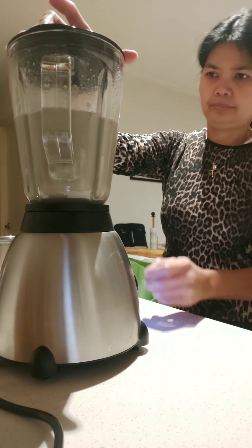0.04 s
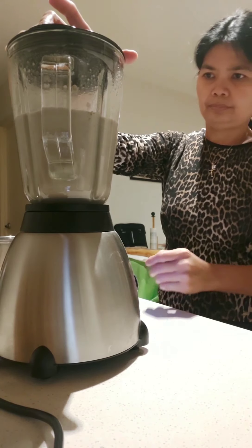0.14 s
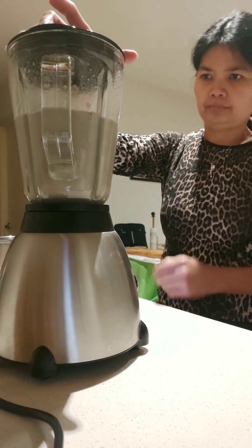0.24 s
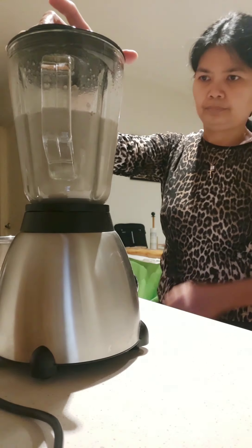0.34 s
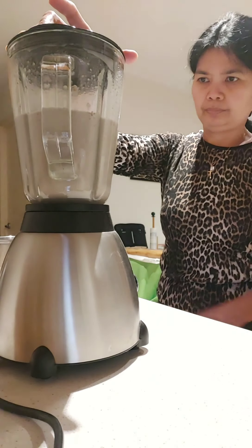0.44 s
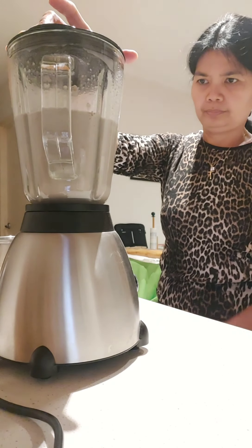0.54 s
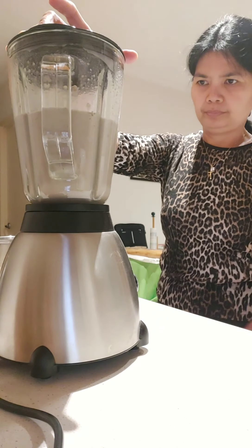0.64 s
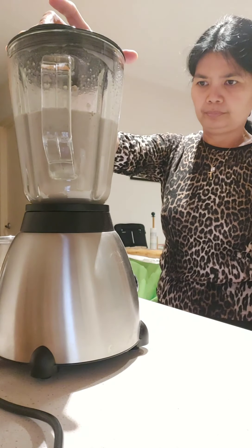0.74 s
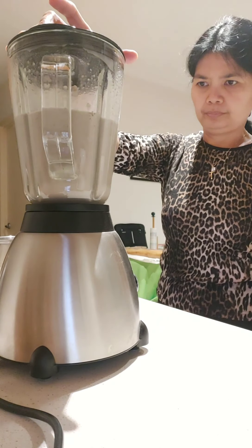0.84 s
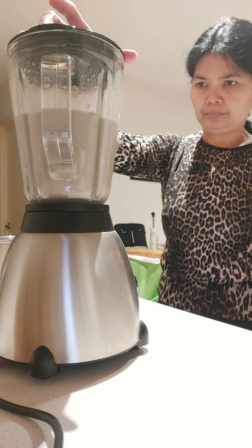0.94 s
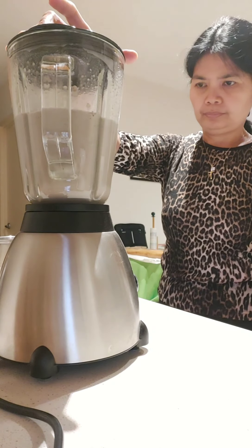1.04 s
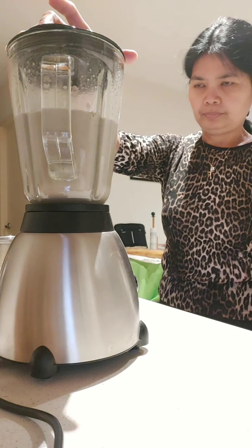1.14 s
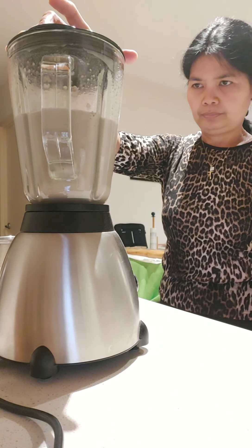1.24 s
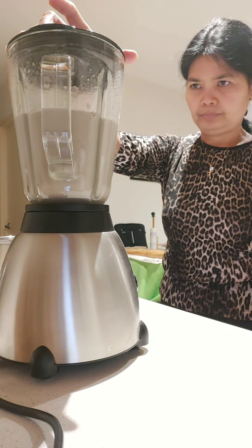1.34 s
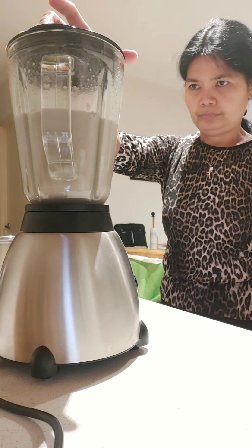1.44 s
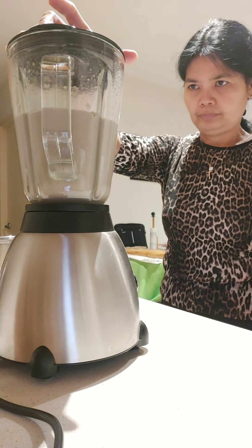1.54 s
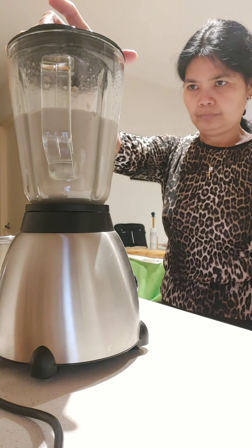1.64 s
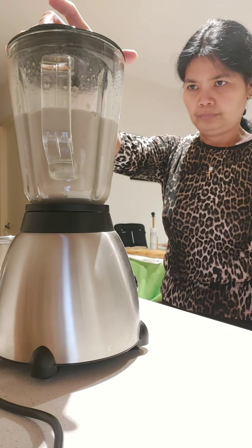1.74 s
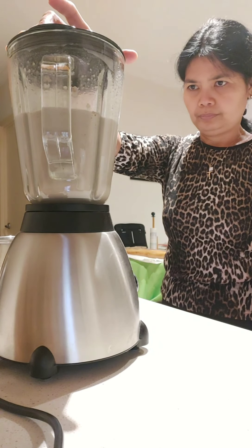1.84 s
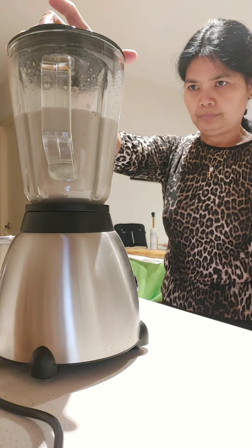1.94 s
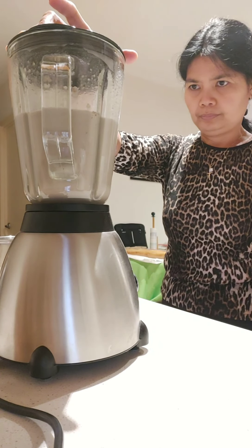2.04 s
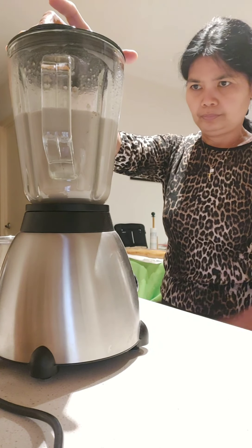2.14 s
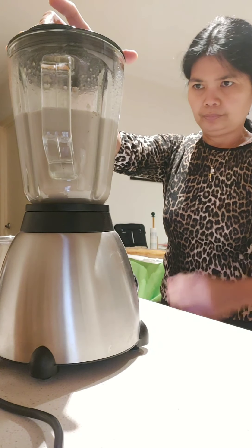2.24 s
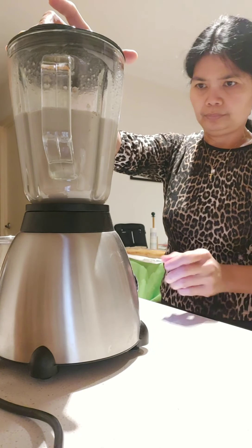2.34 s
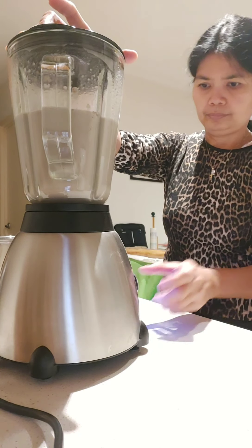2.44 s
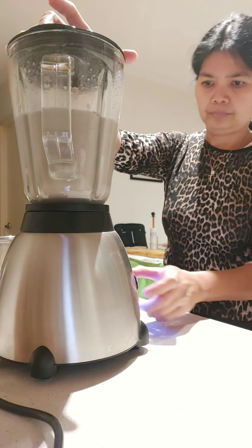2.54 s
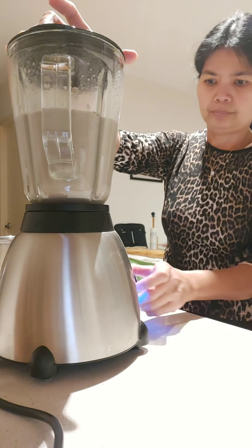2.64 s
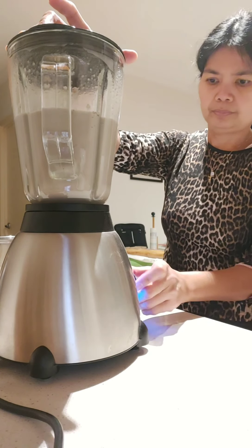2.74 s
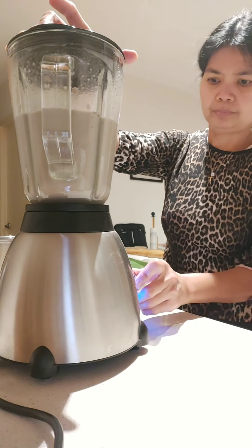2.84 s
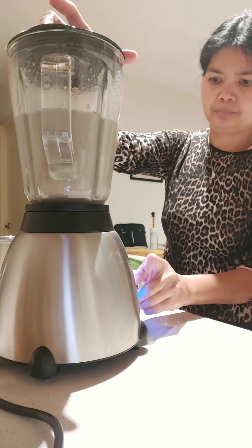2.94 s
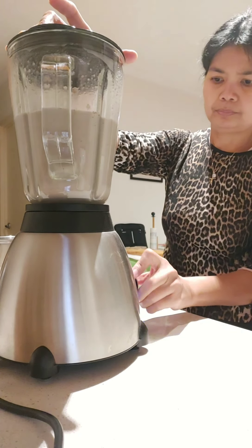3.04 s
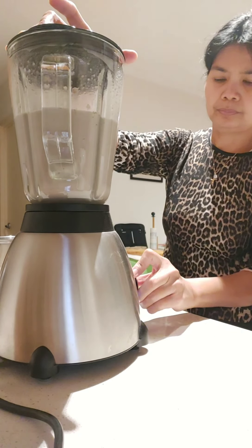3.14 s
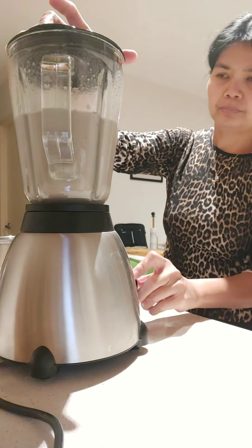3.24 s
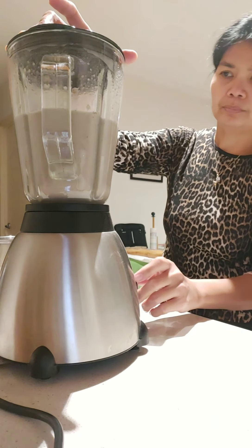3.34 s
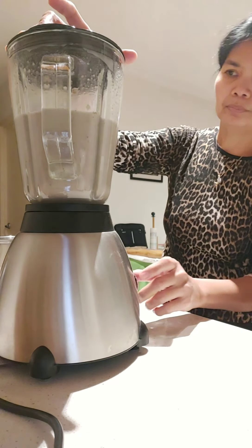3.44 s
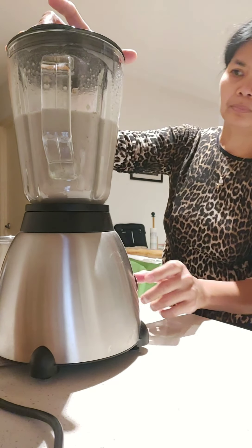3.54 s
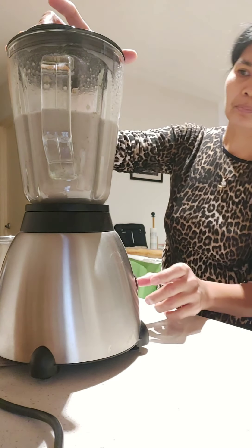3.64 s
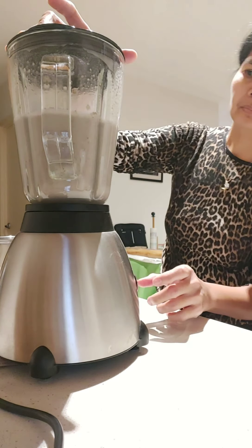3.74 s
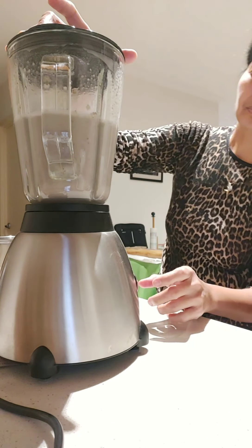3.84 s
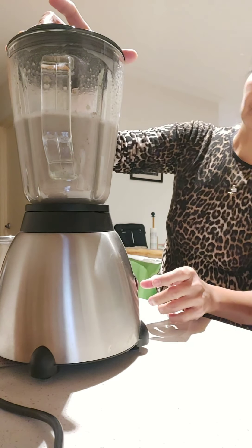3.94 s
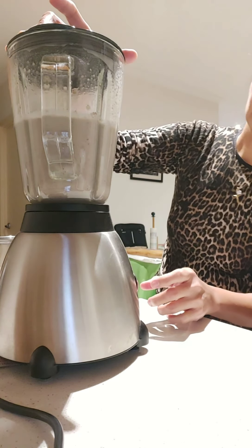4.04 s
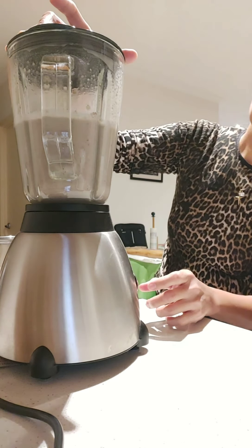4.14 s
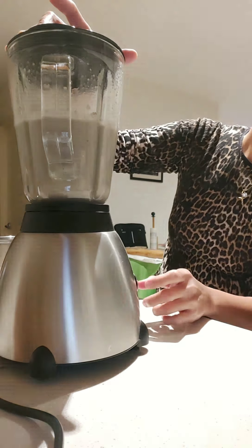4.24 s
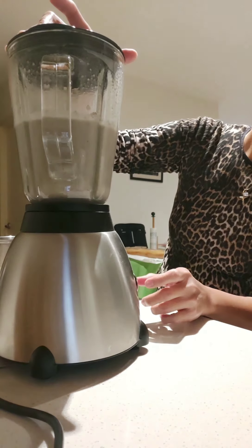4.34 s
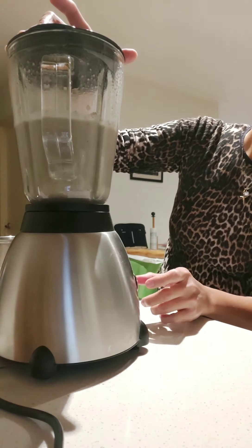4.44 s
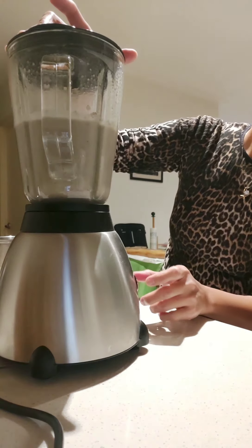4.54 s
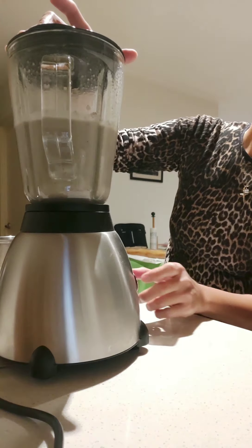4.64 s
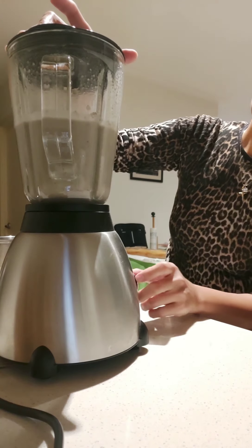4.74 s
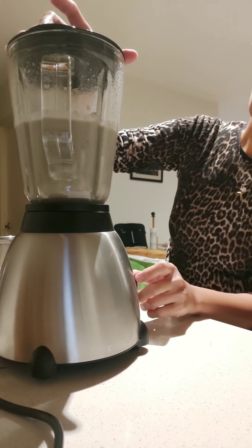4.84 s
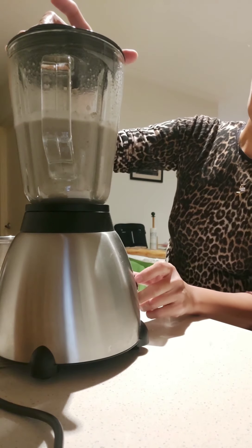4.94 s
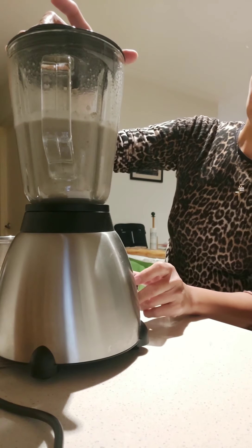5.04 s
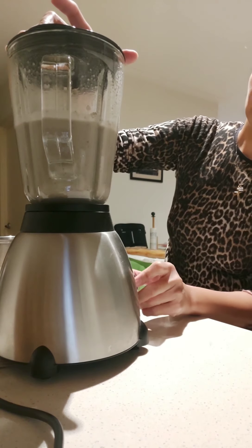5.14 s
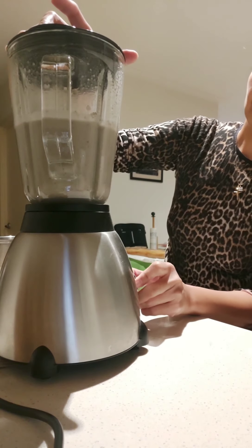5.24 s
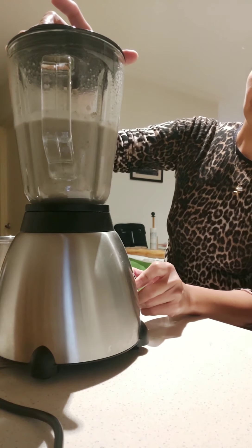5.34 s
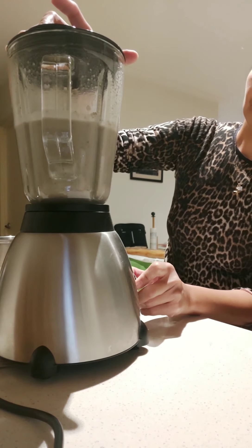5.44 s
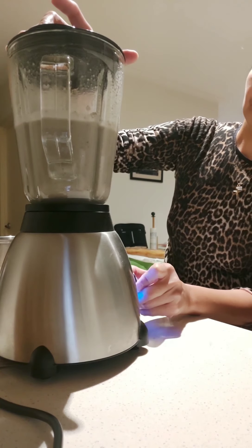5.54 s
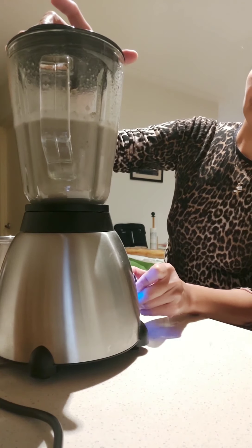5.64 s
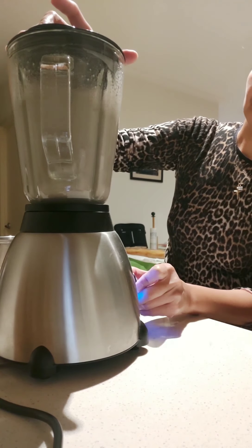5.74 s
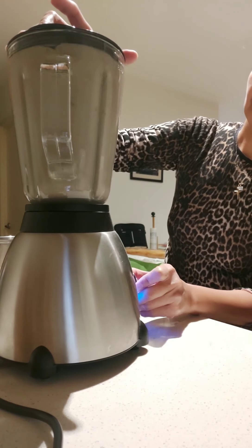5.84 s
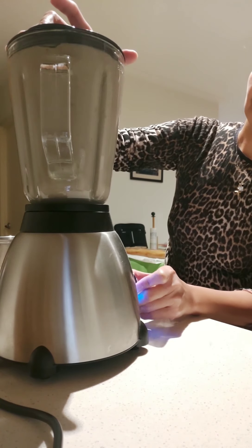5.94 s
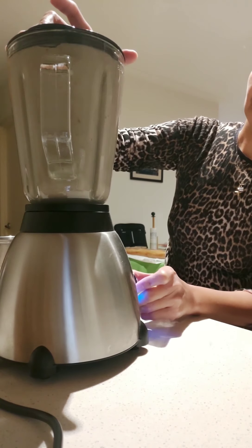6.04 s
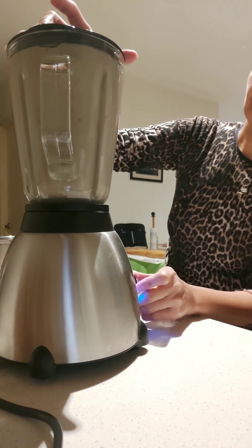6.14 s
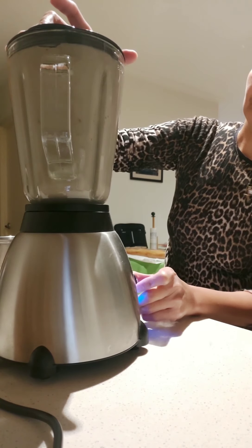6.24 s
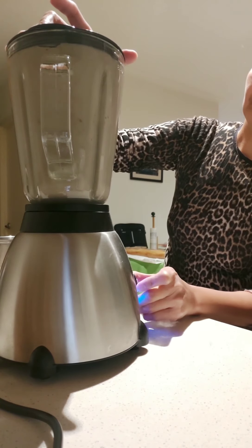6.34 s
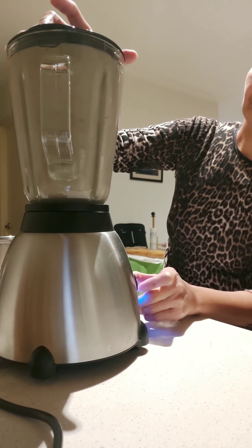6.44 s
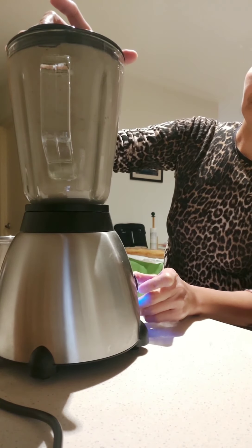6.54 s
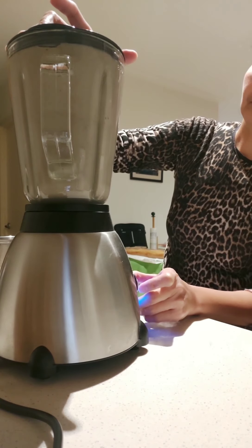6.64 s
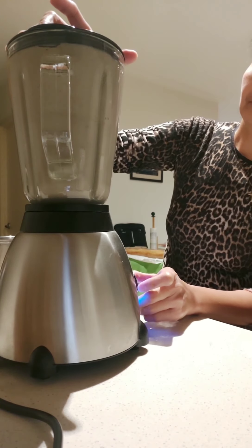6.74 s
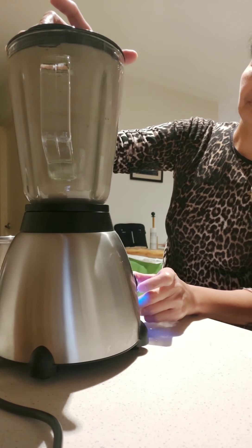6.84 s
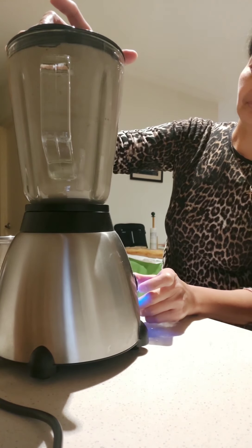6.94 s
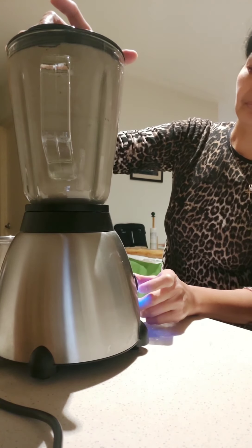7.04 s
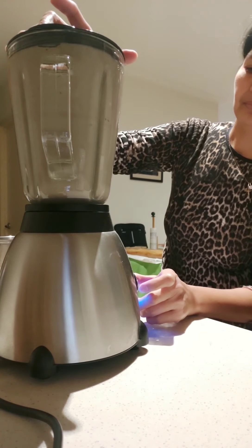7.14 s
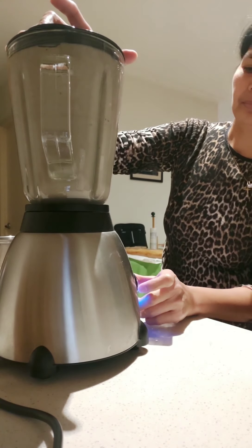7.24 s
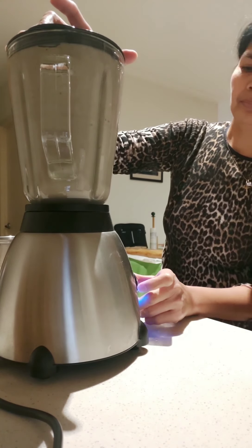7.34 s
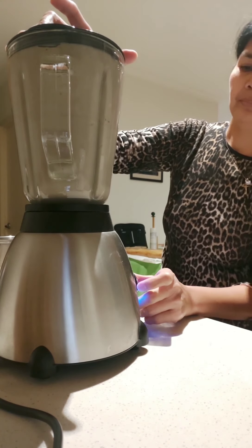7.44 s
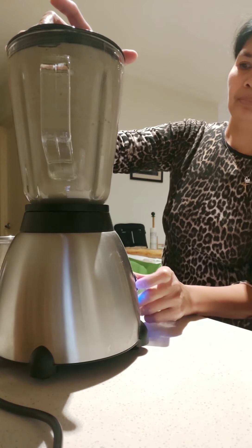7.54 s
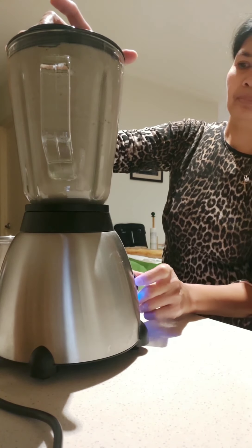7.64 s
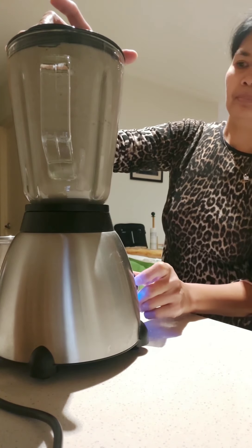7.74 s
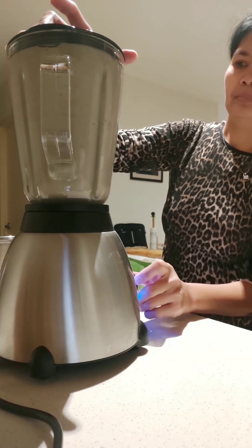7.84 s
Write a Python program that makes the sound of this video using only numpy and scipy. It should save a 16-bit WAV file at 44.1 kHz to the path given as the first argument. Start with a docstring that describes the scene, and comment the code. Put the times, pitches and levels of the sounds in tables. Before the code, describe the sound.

A countertop blender roars with clatter and hiss, winds down to near silence, then snaps back on with a boom, splash and rough churning.

```python
"""Clatter, hiss and shaft hum at once: a countertop blender churns a thick shake, an arm's length away.
The coupling knocks on jar and steel base, the brushes spark, and the unbalanced shaft pushes the base.
Switched off, it coasts down through the resonance of its feet; a thin whine and room noise remain.
Then it snaps on again: the blades bite into settled liquid with a heavy rumble and a splash.
Noise shaped by the jar and base makes the broad layers; shaft-locked sines make hum and overtones."""
import sys
import numpy as np
from scipy import signal
from scipy.fft import rfft, irfft, next_fast_len
from scipy.io import wavfile

SR = 44100
rng = np.random.default_rng(int(sys.argv[2]) if len(sys.argv) > 2 else 0)


def int16_out(signal):
    """Quantize to a 16-bit WAV file."""
    q = np.round(np.clip(np.atleast_2d(signal).T, -1, 1) * 32767)
    wavfile.write(sys.argv[1], SR, q.astype(np.int16))


N = 348390

# coasting sound starts to die; power returns; blades bite
STOP_S, START_S, BITE_S = 3.99, 5.5935, 5.607
# power cut; drag and friction brake equally at EVEN_DRAG_HZ
OFF_S, EVEN_DRAG_HZ, BRAKE_RAD_PER_S = 3.07, 98.1, .825
# restart: the shake heaves, falls back, then a vortex opens over the blades
SPIN_UP_S, HEAVE_RISE_S, HEAVE_HOLD_S, HEAVE_FALL_S = .42, 0.1, 0.19, .045
VORTEX_S, VORTEX_OPENING_S = 5.935, .025
# room noise before the background rises through the pause
AIR_DB, SWELL_DB_PER_S = -69, 4.5
MAINS_HZ, EDGE_HZ = 50, 15900

# broad colour of the machine: (frequency [Hz], relative left [dB], relative right [dB])
BODY_COLOUR = [(29.7, -28, -31), (65, -5, -9.5), (120, -4.5, -3), (200, -19, -14.5), (475, -13.5, -15),
               (776, -13, -2), (1275, -13.5, -11.5), (2540, -5.5, -1.5), (3120, -11.5, -6),
               (4800, -10.5, -10), (5775, -12, -3.5), (7800, -23, -18), (11300, -22, -17),
               (14600, -25, -22), (16020, -34, -15)]
# resonances of jar, liquid and base: (frequency [Hz], width [Hz], left boost [dB], right boost [dB])
BODY_RESONANCES = [(318.2, 84, 16.5, 20), (439, 53, 7.5, 5), (498, 49, 5.5, 8), (594, 19, 4.5, 9.5),
                   (850, 20, 2.5, -8), (922, 45, 5, 0.5), (1034, 60, 3.5, 11), (1160, 88, 6.5, 9.5),
                   (1351.5, 46, 9, 13.5), (1550, 170, 3, 8.5), (1694, 90, -1, 6.5), (1791, 59, -6.5, 9.5),
                   (2019, 50, -5, 12.5), (2213, 55, 13, 1.5), (2435, 98, -0.5, 10.5), (2520, 58, 6.5, -2),
                   (2657.6, 64.5, 9, 12.5), (2710, 70, 2.5, -1), (2850, 160, -7.5, 4), (3963, 200, 0, -2.5),
                   (5020, 50, 3.5, 7), (5327, 70, 1.5, 9), (5540, 72, 3.5, 1.5), (5960, 73, 1.5, 3.5),
                   (6080, 53, 3.5, 7), (7570, 290, 11.5, -9)]
# dial tick, contact snap, coupling bang, jar boom:
# (time [s], level before envelope [dB], centre [Hz], width [octaves], decay [s])
BLOWS = [(5.095, -68, 1000, 0.59, .012), (5.5933, -17.5, 5670, 0.55, 0.0056),
         (5.606, -15.5, 2000, 1.3, 0.0023), (5.612, -8.5, 302, 0.42, 0.012)]
# likeness of the two microphones: (frequency [Hz], shared amplitude [0-1])
MIC_LIKENESS = [(60, 1), (300, 0.97), (500, 0.9), (1000, 0.46), (3000, 0.21), (8000, 0.2), (16000, 0)]
# colour of the quiet kitchen: (frequency [Hz], relative level [dB])
KITCHEN_COLOUR = [(30, -31.5), (70, -5.5), (115, 2), (175, -9), (320, -1.5), (440, -11.5), (620, -25.5),
                  (1000, -24.5), (1400, -35.5), (3500, -34), (4150, -20.5), (5000, -40.5), (5700, -25),
                  (7500, -42.5), (13000, -36)]
# whine of the speed control: (frequency [Hz], level before swell and channel gain [dB])
WHINE_TONES = [(4048, -87), (4247, -88.5)]
# speed under power, before coast and spin-up, one table a run: (time [s], speed [turns/s])
CRUISE_SPEED = [
    [(0.0, 220.1), (1.23, 217.0), (2.08, 217.1), (2.28, 218.9), (3.08, 217.0)],
    [(6.2, 225.7), (6.73, 218.0), (6.918, 217.1), (7.052, 221.6), (7.9, 221.1)],
]
# work of the blades in the shake: (time [s], level re usual [dB])
BLADE_EFFORT = [(0.1, -0.46), (1.1, 0), (1.68, -0.2), (1.9, 1), (2.15, -2), (2.42, -0.6), (2.78, -1.4),
                (3.04, 0.44), (6.05, -2.8), (6.35, -1), (6.56, -1.6), (6.79, 0), (6.96, -2.1), (7.2, -1.5),
                (7.65, -2.4)]
# hum passed on by the feet, before load: (shaft speed [Hz], level [dB])
FEET_RESPONSE = [(50, -61), (84, -34.5), (98, -48), (108, -24), (119, -21), (148, -25.5), (172, -33.5),
                 (217, -34.5)]
# brief surges: a flare as the power is cut, then liquid falling on the blades: (time [s], half length [s],
# churn [dB], clatter [dB], spray [dB])
BRIEF_SURGES = [(3.115, 0.022, -3, 1, 4.5), (3.594, 0.017, -2, 0, 1), (5.984, 0.033, 2, 2, 4),
                (6.356, 0.064, 3.5, 0, 2.2)]

TIME = np.arange(N) / SR
HZ = np.fft.rfftfreq(2 * next_fast_len(N // 2 + 4096), 1 / SR)


def amp(db):
    """Decibels to gain."""
    return 10 ** (np.asarray(db) / 20)


def evened(x):
    """Scales to an rms of one."""
    return x / np.sqrt(np.mean(x ** 2) + 1e-20)


def curve(rows, axis=1):
    """One column of a time table, at every sample."""
    rows = np.array(rows)
    return np.interp(TIME, rows[:, 0], rows[:, axis])


def spectrum(rows, axis=1):
    """One column of a frequency table, at every bin."""
    rows = np.array(rows)
    return np.interp(np.log(HZ + 1), np.log(rows[:, 0]), rows[:, axis])


def bins(x):
    """Spectrum of a signal, padded against wrap-round of ringing."""
    return rfft(x, 2 * len(HZ) - 2)


def below(corner_hz, slope):
    """Gain of a smooth low-pass; a negative slope makes it a high-pass."""
    return 1 / np.sqrt(1 + ((HZ + 1) / corner_hz) ** (2 * slope))


def bump(centre_hz, octaves):
    """Bell on a log-frequency axis, peak one."""
    return np.exp(-.5 * (np.log2((HZ + 1) / centre_hz) / octaves) ** 2)


def wander(rate_hz):
    """Low-passed noise with an rms of one."""
    smoothing = signal.butter(2, rate_hz, fs=SR, output="sos")
    noise = rng.standard_normal(N + SR)
    return evened(signal.sosfilt(smoothing, noise)[SR:])  # drops the filter's start


def pair(envelope=1, lag_s=0.000439):
    """Spectra of enveloped noise at two microphones; the shared part reaches the right one later."""
    left, other = bins(rng.standard_normal((2, N)) * envelope)
    same = np.clip(spectrum(MIC_LIKENESS), 0, 1)
    shared = same * left * np.exp(-2j * np.pi * HZ * lag_s)
    return np.array([left, shared + np.sqrt(1 - same ** 2) * other])


def sounded(z, band_hz):
    """Spectra to sound, scaled so that the channel mean has an rms of one inside a band."""
    inside = irfft(z.mean(0) * (HZ > band_hz[0]) * (HZ < band_hz[1]))[:N]
    return irfft(z)[:, :N] / inside.std()


def blender(body, surge_db=1.16, flutter_db=0.61, fizz_db=1.0, swirl_db=1.0):
    """Liquid, coupling and brushes each excite their own range of the same jar and base."""
    speed_hz = shaft_speed()
    turns = np.cumsum(speed_hz * (1 + .003 * wander(11))) / SR
    lumps = wander(15)  # lumps and air pockets pass the blades

    shake = sounded(pair() * body * below(190, 4), (55, 180))
    churn = sounded(pair(lag_s=0.0002) * body * below(220, -4.5) * below(620, 1.77), (250, 420))
    liquid = shake * amp(shake_level())
    liquid += churn * amp(churn_level() + surge_db * lumps + swirl_db * wander(3))
    low = liquid + hum(turns, speed_hz) + overtones(turns, speed_hz)
    low *= running(BITE_S, 0.0019, fade_db_per_s=91)

    rattling = pair(knocks(turns)) * body * below(950, -0.89) * below(5200, 3)
    first_run = sounded(rattling, (1500, 3000))
    second_run = sounded(rattling * frothy(), (1500, 3000))
    clatter = np.where(TIME < START_S, first_run, second_run)
    clatter *= amp(clatter_level(speed_hz) + flutter_db * lumps)
    clatter *= running(START_S, 0.0018, fade_db_per_s=137)

    hiss = sounded(pair(sparks()) * body * below(5200, -1.86), (7000, 15000))
    hiss *= amp(hiss_level() + fizz_db * lumps) * running(START_S, 0.0016, fade_db_per_s=98)
    return low + clatter + hiss


def shaft_speed(spin_up_power=.42):
    """Turns per second; on restart the shaft gains speed quickly, then more slowly, until it cruises."""
    spin_up = np.clip((TIME - START_S) / SPIN_UP_S, 1e-4, 1) ** spin_up_power
    return curve(np.vstack(CRUISE_SPEED)) * np.where(TIME < START_S, coasting(), spin_up)


def coasting():
    """Share of speed kept without power: falls fast, then gently; held from STOP_S, one after restart."""
    cruise_hz = np.interp(OFF_S, *np.transpose(CRUISE_SPEED[0]))
    full = np.arctan(cruise_hz / EVEN_DRAG_HZ)
    # quadratic liquid drag plus constant friction: the arctangent of speed falls linearly
    braked = full - BRAKE_RAD_PER_S * (np.clip(TIME, OFF_S, STOP_S) - OFF_S)
    return np.where(TIME < START_S, np.maximum(np.tan(braked) / np.tan(full), 1e-2), 1)


def running(start_s, rise_s, fade_db_per_s):
    """Gate of a layer: one, dying away from STOP_S, then rising again at the restart."""
    dying = amp(-fade_db_per_s * np.maximum(TIME - STOP_S, 0))
    return np.where(TIME < START_S, dying, np.clip((TIME - start_s) / rise_s, 0, 1))


def knocks(turns, spread_db=3, decay_half_turns=0.44, bed=1.0):
    """The coupling knocks twice a turn, each time with another force."""
    force = amp(spread_db * np.clip(rng.standard_normal(8192), -2, 2))
    half_turns = 2 * turns
    return bed + force[half_turns.astype(int)] * np.exp(-(half_turns % 1) / decay_half_turns)


def clatter_level(speed_hz, db=-20.0, octave_db=12.5, buried_db=-5, heave_db=-5, froth_db=0.2,
                  rocking_db=-5, rocking_hz=108, octaves=0.2):
    """Clatter falls steeply with speed; liquid muffles it, and it eases as the base rocks on its feet."""
    rocking = (TIME < STOP_S) * np.exp(-.5 * (np.log2(speed_hz / rocking_hz) / octaves) ** 2)
    load_db = buried_db * buried() + heave_db * heave() + froth_db * (TIME > START_S)
    drive_db = effort() + surges(axis=3) + octave_db * np.log2(coasting())
    return db + drive_db + load_db + rocking_db * rocking


def sparks(depth=0.34, decay_cycles=0.045, spit_db=0.94):
    """The brushes spark hardest as the speed control fires in each mains cycle."""
    firing = np.exp(-(MAINS_HZ * TIME % 1) / decay_cycles)
    return (1 + depth * firing) * amp(spit_db * wander(250))


def hiss_level(db=-35.0, octave_db=10.0, unpowered_db=-3, dying_s=0.099, buried_db=-1.0, effort_share=0.46):
    """Hiss drops a little with the power; spray follows the speed and needs air at the blades."""
    unpowered = (TIME < START_S) * np.clip((TIME - OFF_S) / dying_s, 0, 1)
    spray_db = octave_db * np.log2(coasting()) + buried_db * buried()
    spray_db += effort_share * effort() + surges(axis=4)
    return db + unpowered_db * unpowered + spray_db


def hum(turns, speed_hz, second_db=-17, waver_db=1.5, left_db=-5, right_db=3, lag_s=0.00081):
    """Once a turn the unbalance pushes the base; the two blade arms add the octave."""
    angle = 2 * np.pi * (turns - np.array([[0], [lag_s]]) * speed_hz)
    level = amp(hum_level(speed_hz) + waver_db * wander(11))
    second = amp(second_db) * (1 + .5 * wander(9.8)) * np.sin(2 * angle)
    full_speed = (speed_hz / speed_hz.max()) ** 2  # a slow hum reaches both microphones alike
    side = amp(np.array([[left_db], [right_db]]) * full_speed)
    return np.sqrt(2) * level * (np.sin(angle) + second) * side


def hum_level(speed_hz, heave_db=12.0, unsettled_db=-15, settle_s=0.35, froth_db=-2.5):
    """Hum booms at the resonance of the feet, more so in the heave; the young vortex damps it."""
    hz, db = np.transpose(FEET_RESPONSE)
    load_db = heave_db * heave() + unsettled_db * unsettled(settle_s) * (1 - heave())
    return np.interp(speed_hz, hz, db) + load_db + froth_db * (TIME > START_S)


def overtones(turns, speed_hz, db=-35.5, jar_hz=325, width_hz=90):
    """As the speed changes, the second and third orders sweep through the low ring of the jar."""
    out = 0
    for order in (2, 3):
        ring = 1 / (1 + (2 * (order * speed_hz - jar_hz) / width_hz) ** 4)
        out = out + ring * np.sin(2 * np.pi * order * turns)
    return amp(db) * out


def shake_level(db=-37, octave_db=3.0, heave_db=14.0, unsettled_db=6, settle_s=0.68):
    """The base shakes the counter at any speed, most while the liquid heaves."""
    return db + octave_db * np.log2(coasting()) + heave_db * heave() + unsettled_db * unsettled(settle_s)


def churn_level(db=-30.5, octave_db=9.5, heave_db=12, effort_share=0.28):
    """Churning follows the coasting speed and swells with the heave."""
    return db + octave_db * np.log2(coasting()) + heave_db * heave() + effort_share * effort() + surges(axis=2)


def heave():
    """The settled liquid is set moving, 0-1: attack, hold, release."""
    age_s = np.maximum(TIME - BITE_S, 0)
    rise = np.sqrt(np.minimum(age_s / HEAVE_RISE_S, 1))
    return rise * np.exp(-np.maximum(age_s - HEAVE_HOLD_S, 0) / HEAVE_FALL_S)


def buried():
    """One from the restart until the vortex lets air down to the blades."""
    return (TIME > START_S) * np.clip((VORTEX_S - TIME) / VORTEX_OPENING_S, 0, 1)


def unsettled(settle_s):
    """One from the restart, fading once the vortex opens and the flow finds its shape."""
    return (TIME > START_S) * np.exp(-np.maximum(TIME - VORTEX_S, 0) / settle_s)


def effort():
    """Decibels above or below the usual work of the blades."""
    return curve(BLADE_EFFORT)


def surges(axis):
    """Decibels that the brief surges add to one layer."""
    return sum(row[axis] * np.exp(-.5 * ((TIME - row[0]) / row[1]) ** 2) for row in BRIEF_SURGES)


def frothy(db=-1.5, hz=1600, octaves=0.53):
    """Air beaten into the shake damps the middle range of the jar."""
    return amp(db * bump(hz, octaves))


def machine_body():
    """Causal (minimum-phase) response of jar and base toward each microphone."""
    db = np.array([spectrum(BODY_COLOUR, axis=1), spectrum(BODY_COLOUR, axis=2)])
    for hz, width_hz, left_db, right_db in BODY_RESONANCES:
        db += np.array([[left_db], [right_db]]) / (1 + (2 * (HZ - hz) / width_hz) ** 2)
    # folding the cepstrum forward gives the phase
    cepstrum = irfft(np.log(amp(db)))
    cepstrum[:, 1:len(HZ) - 1] *= 2
    cepstrum[:, len(HZ):] = 0
    return np.exp(rfft(cepstrum))


def scatter(wet=0.36, decay_s=0.012, corner_hz=450):
    """Counter and walls return a quick spray of echoes, which ripples the spectrum."""
    echoes = rng.standard_normal((2, SR // 8)) * np.exp(-TIME[:SR // 8] / decay_s)
    echoes /= np.linalg.norm(echoes, axis=1, keepdims=True)
    share = wet * below(corner_hz, -0.33)
    return (1 + share * bins(echoes)) / np.sqrt(1 + share ** 2)


def slosh(length_s=0.26, db=-23, corner_hz=3900, lumpy_db=2):
    """The first turns throw the settled liquid up the wall of the jar, a broad splash."""
    arch = np.sqrt(abs(np.sin(np.pi * np.clip((TIME - BITE_S) / length_s, 0, 1))))
    colour = below(corner_hz, 5.6) * below(330, -0.87)
    splash = irfft(pair(amp(lumpy_db * wander(130))) * colour)[:, :N]
    return amp(db) * arch * evened(splash)


def jolts(body):
    """Short blows ring the body around their own pitch."""
    out, ringing = np.zeros((2, N)), pair() * body
    for start_s, db, hz, octaves, decay_s in BLOWS:
        ring = irfft(ringing * bump(hz, octaves))[:, :N]
        age_s = np.clip(TIME - start_s, 0, .5)
        envelope = (1 - np.exp(-age_s / 0.00022)) * np.exp(-age_s / decay_s)
        out += amp(db) * evened(ring) * envelope
    return out


def squeak(start_s=4.662, length_s=.1, hz=1722, db=-66, decay_s=.1, rough=0.56, left_db=-20):
    """A faint, uneven squeak as a fingertip slips on the dial."""
    age_s = np.maximum(TIME - start_s, 0)
    edges = np.clip(np.minimum(age_s, length_s - age_s) / .007, 0, 1)
    envelope = edges * np.exp(-age_s / decay_s)
    tone = np.sin(2 * np.pi * np.cumsum(hz + 20 * wander(60)) / SR)
    slip = (1 + rough * wander(50)) * tone
    return np.sqrt(2) * amp(db) * envelope * slip * amp([[left_db], [0]])


def kitchen(left_db=-3, right_db=2, chop=.35):
    """Low room noise and the speed control's thin whine, chopped by the mains; the background level rises
    through the pause."""
    swell = amp(SWELL_DB_PER_S * (np.clip(TIME, STOP_S, START_S) - STOP_S))
    colour = amp(spectrum(KITCHEN_COLOUR)) * below(20, -2)
    air = sounded(pair() * colour, (30, EDGE_HZ)) * amp(AIR_DB)
    whine = sum(np.sqrt(2) * amp(db) * np.sin(2 * np.pi * hz * TIME) for hz, db in WHINE_TONES)
    whine *= 1 + chop * np.cos(2 * np.pi * MAINS_HZ * TIME)
    return (air + whine) * swell * amp([[left_db], [right_db]])


def scene():
    """The blender in its kitchen."""
    body = machine_body() * scatter()
    return blender(body) + slosh() + jolts(body) + squeak() + kitchen()


def record(dry):
    """Rounds off the tallest peaks, then limits the band."""
    knee = .7
    over = np.maximum(abs(dry) - knee, 0)
    rounded = dry - np.sign(dry) * (over - (1 - knee) * np.tanh(over / (1 - knee)))
    low_pass = signal.firwin(511, EDGE_HZ, window=("kaiser", 9), fs=SR)
    return signal.oaconvolve(rounded, low_pass[None], "same")


dry = scene()
out = record(dry)
int16_out(out)
```